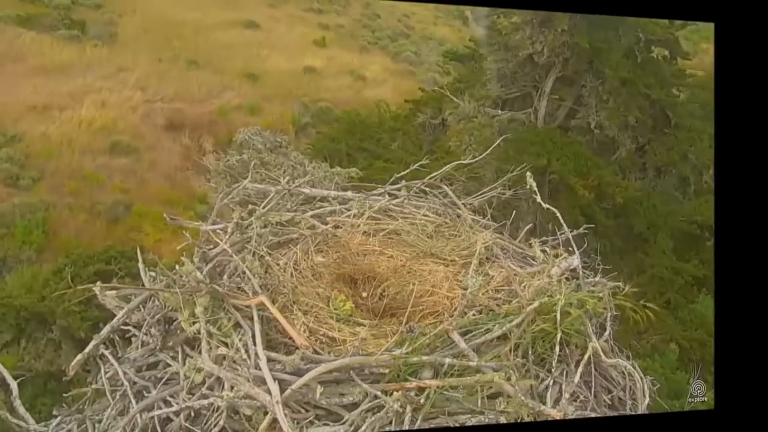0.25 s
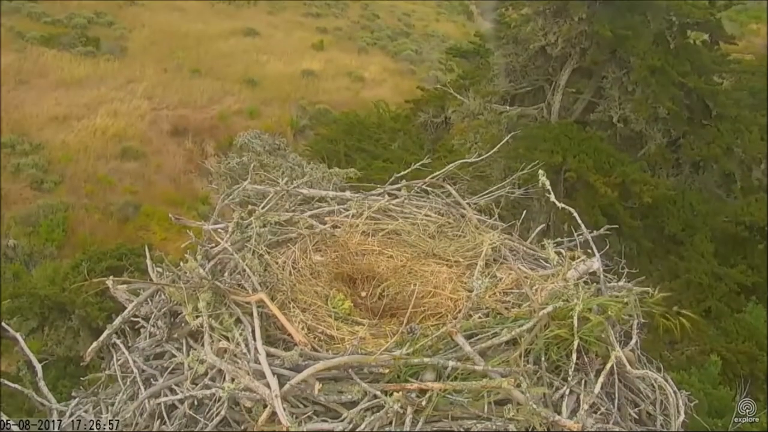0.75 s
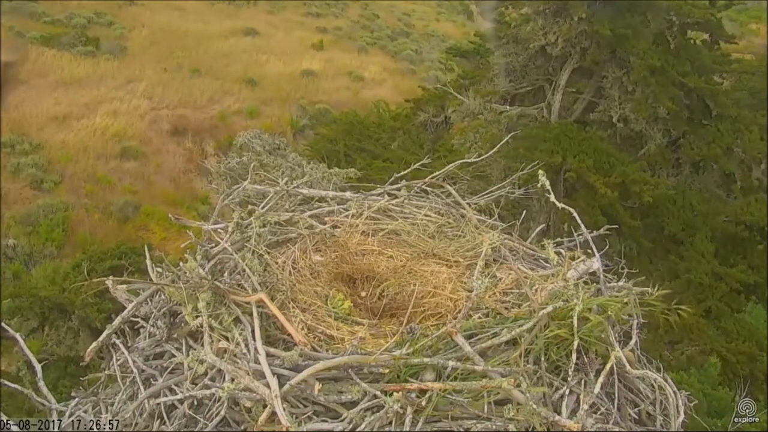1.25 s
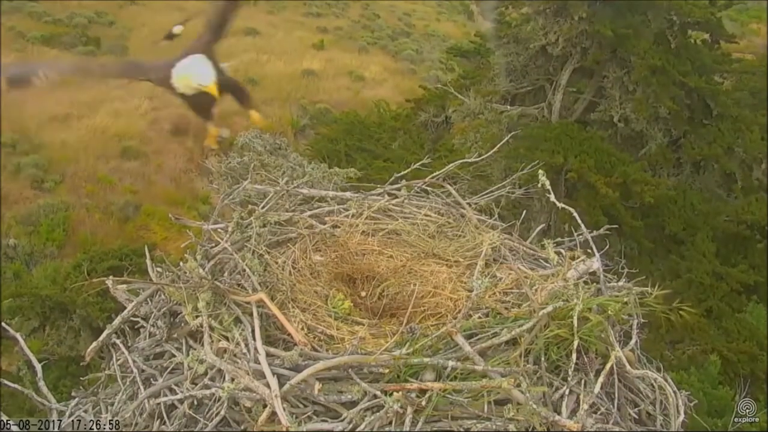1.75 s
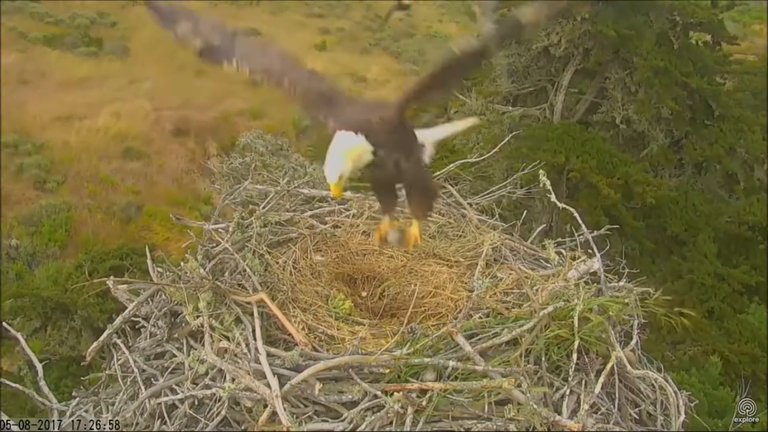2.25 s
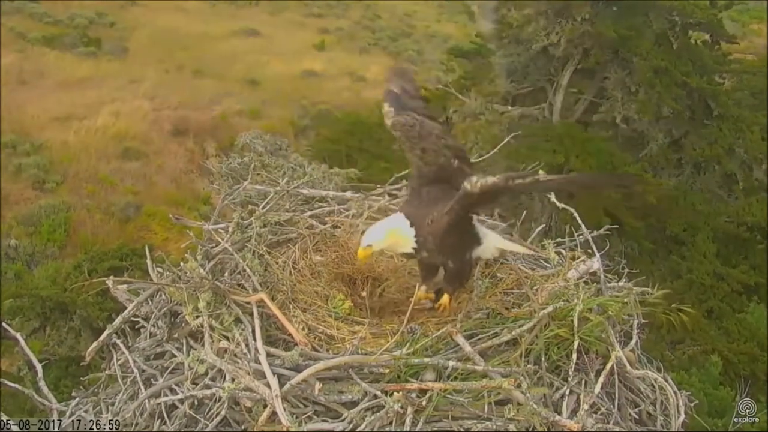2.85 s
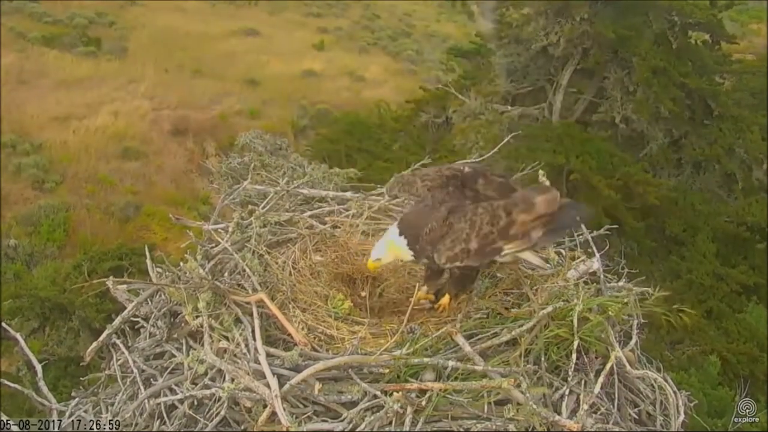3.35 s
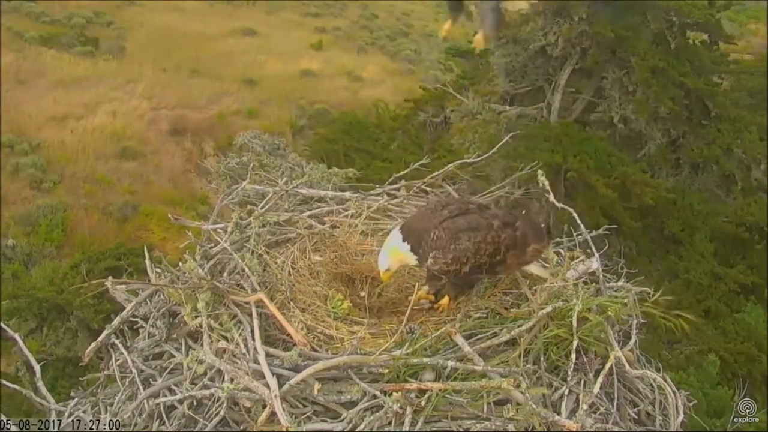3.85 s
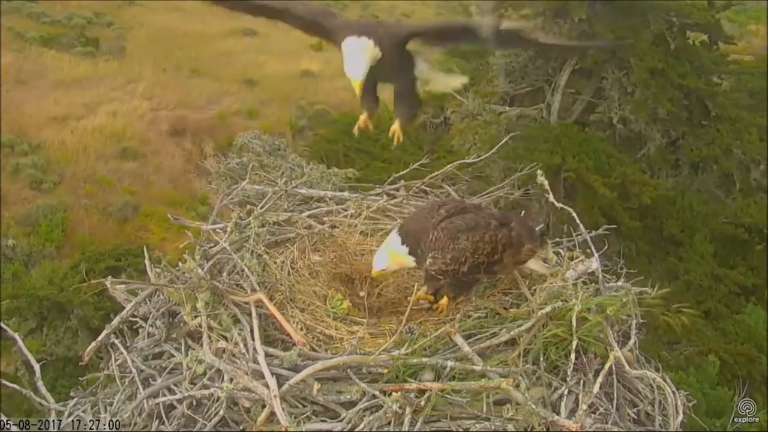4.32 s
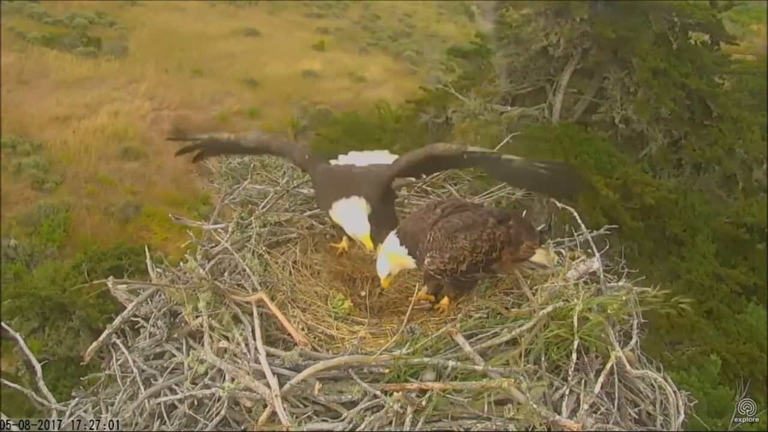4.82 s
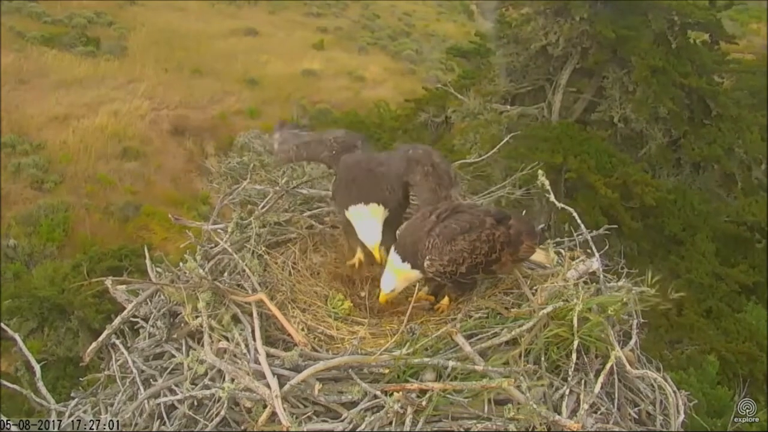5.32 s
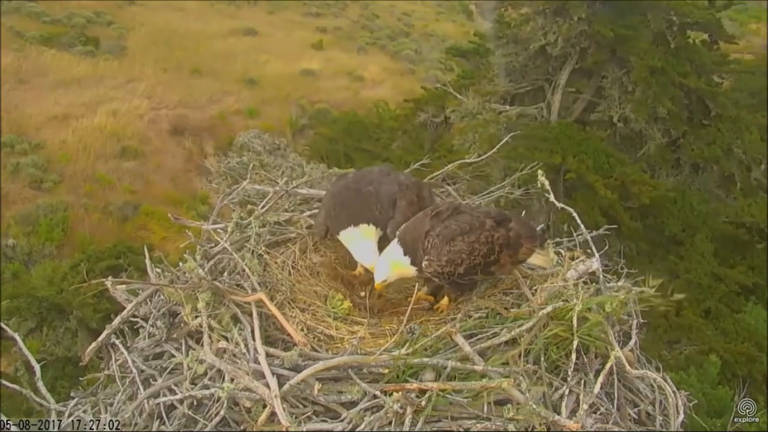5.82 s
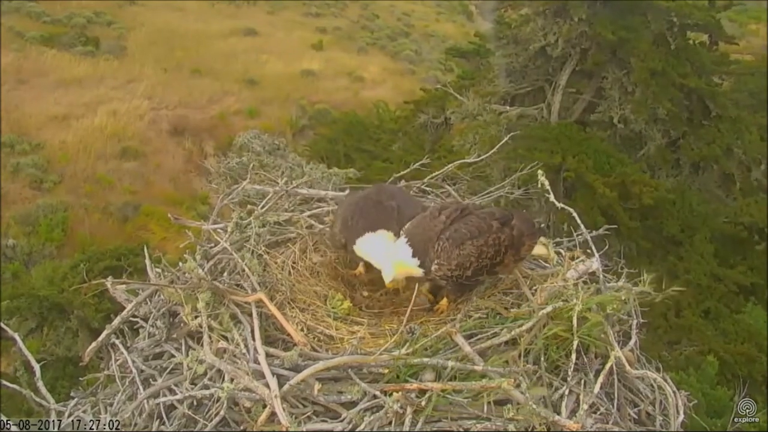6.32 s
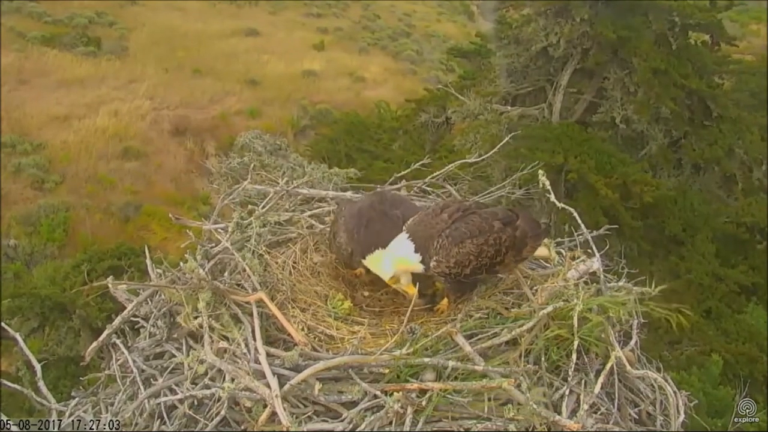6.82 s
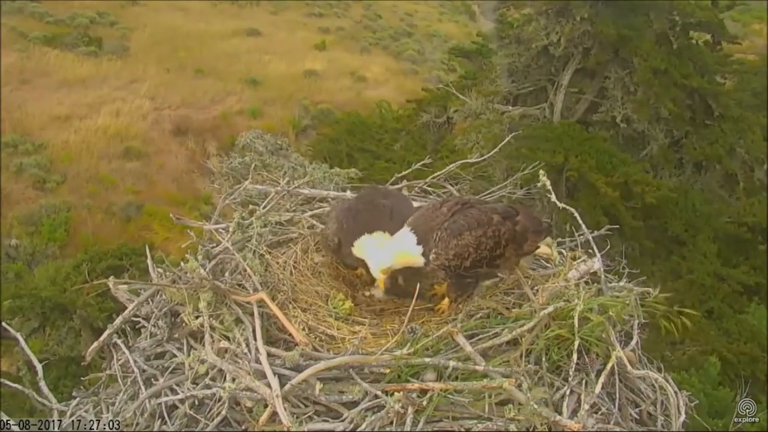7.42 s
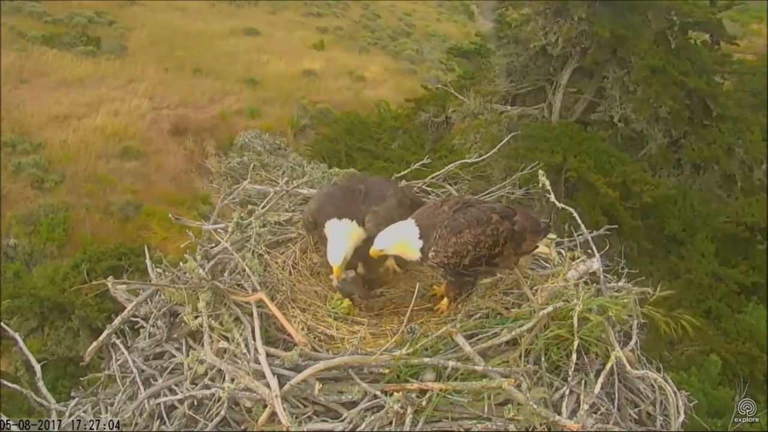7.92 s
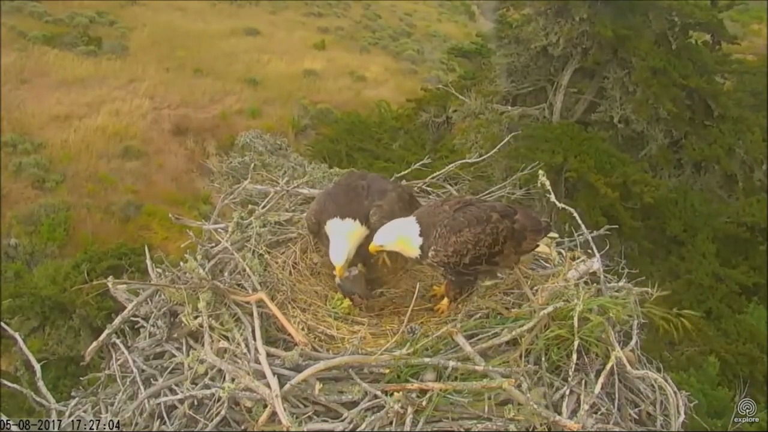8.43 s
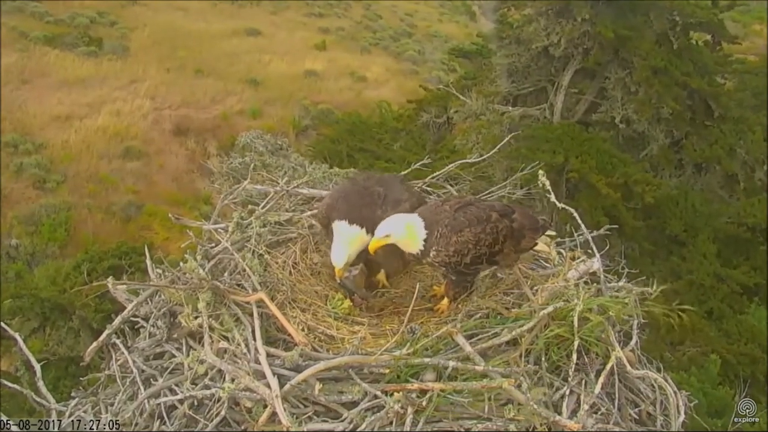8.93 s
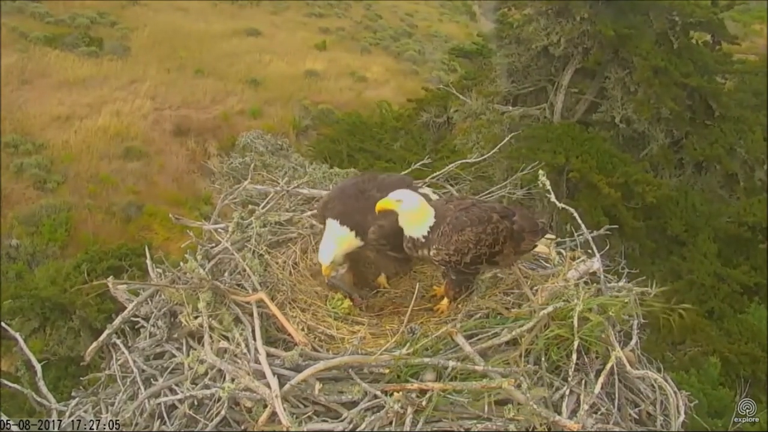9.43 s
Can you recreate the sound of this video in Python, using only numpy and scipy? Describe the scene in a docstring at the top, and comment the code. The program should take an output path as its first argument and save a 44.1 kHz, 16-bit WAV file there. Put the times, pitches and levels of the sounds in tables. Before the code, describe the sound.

Large birds of prey land at a nest and whistle shrilly: small broken chirps first, a brief loud note, a pause, then rapid chatter stretching into long quivering squeals with rough, breathy edges. A faint diffuse echo comes off the open hillside. The mono, slightly distorted nest microphone also picks up gusting wind rumble, soft foliage hiss, a faint high whine, and tiny stick clicks after the calling ends.

```python
"""Two eagles at a stick nest whistle long, piercing notes, amid twig ticks, wind rumble, leaf hiss and a thin whine.
The voices are unsteady sines with side tones and breath; wind and leaves are coloured noise; a twig is a short ring.
Loud notes overload a nest camera's microphone, and the surroundings sink while the birds call.
A crude change from 48 to 44.1 kHz takes the nearest sample, adding copies of tones by multiples of 3.9 kHz."""
import sys
import numpy as np
from scipy import signal
from scipy.fft import rfft, irfft
from scipy.io import wavfile
from scipy.ndimage import uniform_filter1d, map_coordinates

SR = 44100
rng = np.random.default_rng(int(sys.argv[2]) if len(sys.argv) > 2 else 0)


def int16_out(signal):
    """Quantize to a 16-bit WAV file."""
    q = np.round(np.clip(np.atleast_2d(signal).T, -1, 1) * 32767)
    wavfile.write(sys.argv[1], SR, q.astype(np.int16))


def voltage_ratio(level):
    """Linear amplitude factor for a level in decibels (scalar or array-like)."""
    return 10 ** (np.asarray(level, float) / 20)


N = 426447  # length of the scene in samples


def unit(x):
    """Scales a sound to rms 1."""
    return x / np.sqrt(np.mean(x ** 2) + 1e-20)


def curve(rows):
    """Joins (time, value, ..) rows by straight lines: one value per sample for each column."""
    times_s, *columns = np.transpose(rows)
    now_s = np.arange(N) / SR
    return np.squeeze([np.interp(now_s, times_s, column) for column in columns])


def wobble(rate):
    """Draws a smooth random curve through `rate` random points a second."""
    points = rng.standard_normal(int(N * rate / SR) + 4)
    return map_coordinates(points, [np.arange(N) * rate / SR])


def noise(spectrum, patchy_db):
    """Colours random noise by frequency, with random louder and softer patches, at rms 1."""
    hz, _, cells = signal.stft(rng.standard_normal(N), SR, nperseg=1024)
    patches = uniform_filter1d(rng.standard_normal(cells.shape), 8, 0)  # smooth over frequency
    patches = uniform_filter1d(patches, 6, 1)  # and over time
    table_hz, table_db = np.transpose(spectrum)
    colour_db = np.interp(np.log(hz + 1), np.log(table_hz + 1), table_db, left=-120, right=-120)
    gain = voltage_ratio(colour_db[:, None] + patchy_db * unit(patches))
    _, sound = signal.istft(cells * gain, SR, nperseg=1024)
    return unit(sound[:N])


def wind():
    """Gusts rumble on the microphone port, swelling at several speeds; the port cuts the lowest bass."""
    # strength of the gusts before the quicker swells and the sinking: (time [s], level [dB])
    gusts = [(0, -28), (1.0, -27.5), (1.72, -27), (2.5, -30.5), (3.37, -29), (4.09, -31), (4.74, -37),
             (5.22, -22), (5.63, -35), (6.1, -28), (6.76, -26), (6.9, -39.5), (7.15, -31), (7.67, -28),
             (8.21, -34), (8.5, -29.5), (9.1, -28.5), (9.67, -30)]
    # colour of the rumble before the bass cut: (frequency [Hz], relative level per Hz [dB])
    rumble = [(29, -66.5), (50, -66.5), (99, -2), (157, -0.5), (221, -5.5), (381, -29.5), (937, -36),
              (1300, -59.5), (1690, -106), (2860, -120)]
    swells = voltage_ratio(0.89 * wobble(3.32) + 1.47 * wobble(13))
    low_cut = signal.butter(3, 85, "high", fs=SR, output="sos")
    sound = signal.sosfilt(low_cut, swells * noise(rumble, patchy_db=1.5))
    return voltage_ratio(curve(gusts)) * unit(sound)


def foliage():
    """Leaves hiss: steady noise, strongest in the middle treble."""
    # colour of the hiss: (frequency [Hz], relative level per Hz [dB])
    leaves = [(650, -52.5), (1100, -20), (1830, -16), (2870, -0.5), (3740, -6), (5220, -30), (6280, -16),
              (6440, -38.5), (9000, -35.5), (11700, -55), (19800, -120)]
    return voltage_ratio(-56.5) * noise(leaves, patchy_db=1.6)


def whine():
    """The camera's electric whine: one high sine whose level wavers slightly."""
    whine_hz = 10008
    level = voltage_ratio(-58.5 + 0.86 * wobble(4.8))
    return level * np.sin(2 * np.pi * whine_hz * np.arange(N) / SR)


def sinking(calls):
    """Gain in dB of the surroundings: it falls while the calls are loud, then creeps back."""
    start_db, deepest_db = -7.5, -10.5
    loud_db = -22.5  # calls at this level push half as hard as they can
    sink_s, creep_db_per_s = 0.18, 5  # time constant of a full push; speed of return without any
    hop = SR // 100  # steps of 10 ms
    power = np.mean(calls[:N // hop * hop].reshape(-1, hop) ** 2, axis=1)
    loudness = power / voltage_ratio(loud_db) ** 2
    gain_db = [start_db]
    for push in loudness / (1 + loudness):
        fall = push * (gain_db[-1] - deepest_db) / sink_s  # dB per second
        creep = (1 - push) * creep_db_per_s
        gain_db.append(min(0, gain_db[-1] - (fall - creep) * hop / SR))
    return np.interp(np.arange(N) / hop, np.arange(len(gain_db)), gain_db)


def twigs():
    """Dry sticks tick under the birds' feet: a short, fading ring with a noisy crack."""
    # twig ticks: (time [s], starting level of the ring [dB], pitch [Hz])
    ticks = [(1.5534, -35.5, 3080), (7.441, -41.5, 3110), (8.144, -43, 3100), (8.7635, -50, 2680),
             (9.2087, -33, 3120)]
    out = np.zeros(N + SR)
    t = np.arange(800) / SR
    for start_s, db, hz in ticks:
        ring = voltage_ratio(-60 * t / 0.012) * np.sin(2 * np.pi * hz * t)  # falls 60 dB in 12 ms
        crack = voltage_ratio(-60 * t / 0.004) * rng.standard_normal(len(t))
        out[round(start_s * SR):][:len(t)] += voltage_ratio(db) * (ring + 0.27 * crack)
    return out[:N]


def chirp(start_s, length_s, db, first_hz, last_hz):
    """Unfolds a chirp into times, pitch and level: it swells, fades to its end and arches up in pitch."""
    attack_s, rise_db, fade_db = 0.01, 11, 9
    arch = 0.02065  # share of the pitch
    u = np.linspace(0, 1, num=12)  # progress through the chirp
    times_s = start_s + u * length_s
    glide_hz = first_hz + (last_hz - first_hz) * u
    pitch_hz = glide_hz * (1 + arch * np.sin(np.pi * u))
    still_to_rise = np.clip(1 - u * length_s / attack_s, 0, 1)
    return times_s, pitch_hz, db - rise_db * still_to_rise - fade_db * u ** 2


def eagles():
    """Each note is an unsteady sine with weak side tones and breath; notes that overlap roughen the voice."""
    # cries with a shaped contour, one list each, before unsteadiness: (time [s], pitch [Hz], effort [dB])
    cries = [
        [(1.698, 3730, -40), (1.71, 3967, -28.5), (1.742, 3970, -28), (1.765, 3833, -54)],
        [(1.828, 3780, -41), (1.844, 4020, -31.5), (1.862, 4140, -38), (1.886, 3450, -40.5), (1.89, 3541, -39)],
        [(1.9, 3960, -47), (1.925, 4080, -42.5), (1.95, 4430, -43.5), (1.965, 4200, -51)],
        [(2.186, 3400, -44), (2.198, 3590, -32.5), (2.216, 3960, -43), (2.222, 3860, -41), (2.248, 4020, -42),
         (2.262, 3900, -57)],
        [(2.338, 4320, -51.5), (2.356, 4720, -50), (2.39, 4440, -51.5)],
        [(5.283, 4490, -57), (5.291, 4658, -40), (5.309, 4898, -45), (5.357, 4810, -36.5), (5.378, 4470, -34)],
        [(2.395, 3330, -39), (2.421, 3156, -15.5), (2.481, 3200, -20.5), (2.503, 3350, -28), (2.52, 2940, -43)],
        [(3.388, 3550, -33), (3.394, 3553, -17.5), (3.408, 3793, -15.5), (3.424, 3697, -22),
         (3.444, 3309, -17.5), (3.536, 3244, -19.5), (3.562, 3370, -17.5), (3.578, 3746, -16),
         (3.602, 3915, -16), (3.63, 3763, -15.5), (3.67, 3931, -15), (3.688, 3880, -15.5), (3.698, 3229, -20.5),
         (3.712, 3140, -52)],
        [(3.75, 3388, -47), (3.758, 3354, -30), (3.776, 3474, -32), (3.786, 3436, -16), (3.81, 3360, -15.5),
         (3.82, 3180, -28.5)],
        [(3.817, 3636, -33.5), (3.837, 3677, -18), (3.873, 3470, -16), (3.889, 3710, -22), (3.897, 3520, -30.5),
         (3.905, 3405, -28.5)],
        [(3.947, 3933, -36.5), (3.959, 3930, -11.5), (3.971, 3820, -20.5), (3.983, 3615, -20.5),
         (3.993, 3300, -19)],
        [(4.174, 3643, -34.5), (4.186, 3678, -20.5), (4.198, 3670, -12.5), (4.23, 3472, -19.5),
         (4.244, 3207, -21.5), (4.258, 3440, -19), (4.314, 3277, -17.5), (4.324, 3550, -16), (4.36, 3628, -15),
         (4.4, 3541, -15.5), (4.522, 3752, -15.5), (4.596, 3679, -15.5), (4.748, 3883, -16), (4.792, 3781, -14),
         (4.896, 3860, -16.5), (4.914, 3732, -15), (5.022, 3674, -17.5), (5.04, 3880, -33), (5.05, 3875, -31)],
        [(5.125, 3666, -44.5), (5.141, 3598, -15.5), (5.189, 3474, -18), (5.235, 3540, -17.5),
         (5.259, 3620, -34.5), (5.293, 3660, -30.5), (5.308, 3600, -57)],
        [(5.755, 3020, -12.5), (5.767, 3210, -16.5), (5.799, 3235, -17), (5.869, 3058, -17.5),
         (5.949, 3208, -15.5), (6.021, 3187, -16), (6.067, 3106, -15.5), (6.117, 2708, -25.5),
         (6.159, 2773, -24.5), (6.169, 2684, -24), (6.181, 2440, -46)],
        [(6.325, 4006, -55), (6.357, 4050, -40.5), (6.373, 3919, -15.5), (6.383, 3792, -16), (6.423, 3590, -29),
         (6.445, 3700, -40), (6.463, 3706, -20), (6.489, 3613, -19.5), (6.567, 3547, -23.5),
         (6.601, 3610, -18.5), (6.623, 3731, -19.5), (6.661, 3647, -18), (6.691, 3640, -18.5),
         (6.707, 3546, -22.5), (6.765, 3498, -13.5), (6.779, 3571, -16), (6.841, 3379, -16),
         (6.993, 3539, -15.5), (7.025, 3415, -16), (7.059, 3443, -15.5), (7.067, 3294, -20),
         (7.078, 3240, -48.5)],
    ]
    # short chirps between and under the cries, before swell, fade and arch:
    # (start [s], length [s], level [dB], first pitch [Hz], last pitch [Hz])
    chirps = [(1.583, .025, -47, 3700, 3860), (1.575, 0.023, -54.5, 4600, 4600),
              (1.752, .04, -48.5, 4200, 4030), (1.741, 0.022, -35, 3620, 3400),
              (1.807, 0.037, -43, 3920, 4340), (1.806, 0.028, -38.5, 3350, 3530),
              (1.946, 0.032, -34.5, 3530, 3830), (2.184, 0.037, -37.5, 2250, 2540),
              (2.326, 0.024, -39, 3900, 3980), (2.351, 0.031, -46, 4150, 4170),
              (2.386, 0.02, -35.5, 3800, 3910), (2.476, 0.038, -43, 2580, 2580),
              (3.346, 0.023, -28.5, 3150, 3260), (3.344, 0.027, -37, 2100, 2210),
              (3.342, 0.028, -44.5, 1040, 1080), (3.345, 0.026, -45.5, 4250, 4450),
              (3.695, 0.051, -48, 2640, 2440), (3.761, 0.016, -37, 5030, 4840),
              (3.804, 0.051, -20.5, 2600, 2393), (3.898, .078, -15, 2534, 2663),
              (3.955, 0.031, -15.5, 3280, 3120), (4.17, 0.04, -22.5, 3000, 3000),
              (4.62, 0.038, -27, 2991, 3154), (5.018, 0.032, -30, 2460, 2680),
              (5.025, 0.018, -26, 2984, 3280), (5.042, 0.09, -30.5, 4360, 4405),
              (5.17, 0.07, -37.5, 2700, 2705), (5.311, 0.027, -32, 4260, 4200),
              (5.367, 0.021, -14, 3603, 3164), (5.717, 0.054, -14.5, 2870, 2972),
              (6.61, 0.1, -38, 2950, 3000), (6.671, 0.043, -24, 3000, 2840), (8.603, .025, -54, 3300, 3420)]
    # how the voice sits, hoarseness before any clash of notes:
    # (time [s], hoarseness [dB], half-pitch tone [dB], lopsidedness [dB])
    throat = [(2.0, 2.5, -65, -30), (2.4, -2, -57.5, -43.5), (3.78, 3, -63.5, -21), (4.25, 2.5, -37, -22),
              (4.45, 3, -28.5, -17), (4.7, 2, -36.5, -13), (5.0, 3.5, -31, -37.5),
              (5.78, -8.5, -66.5, -34.5), (6.3, 1.5, -30, -33), (6.8, 1, -30.5, -31.5)]
    # colour of the breath: (frequency [Hz], relative level per Hz [dB])
    breath_colour = [(300, -4.5), (1500, -20), (3500, 5.5), (7000, -15.5), (12000, -6), (16000, -10.5)]
    clash_db = 7  # most hoarseness added by two notes at once
    notes = [np.transpose(rows) for rows in cries] + [chirp(*row) for row in chirps]

    tone, effort, total, strongest = np.zeros((4, N))
    for s, hz, db in notes:
        n = np.arange(round(s[0] * SR), round(s[-1] * SR))
        level = voltage_ratio(np.interp(n / SR, s, db))
        total[n] += level
        strongest[n] = np.maximum(strongest[n], level)
    # what sounds besides the strongest note
    clash = uniform_filter1d(np.clip((total - strongest) / voltage_ratio(-27.5), 0, 1), size=600)
    hoarse_db, half_db, lopsided_db = curve(throat)
    hoarse_db = hoarse_db + clash_db * clash
    quiver = 0.00187 * voltage_ratio(hoarse_db) * wobble(120)  # a hoarse voice holds its pitch less well
    shimmer_db = 0.66 * voltage_ratio(hoarse_db) * wobble(150)
    flicker = np.abs(wobble(70))

    for s, hz, db in notes:
        n = np.arange(round(s[0] * SR), round(s[-1] * SR))
        pitch_hz = np.interp(n / SR, s, hz) * (1 + quiver[n])
        phase = 2 * np.pi * np.cumsum(pitch_hz) / SR
        edges = np.clip(np.minimum(n - n[0], n[-1] - n) / (SR * 0.003), 0, 1)  # 3 ms fades
        level_db = np.interp(n / SR, s, db)
        faintness = np.clip(-43.0 - level_db, 0, 15)  # faint notes flicker in and out
        size = np.sqrt(2) * edges * voltage_ratio(level_db + shimmer_db[n] - 0.14 * faintness * flicker[n])
        halves = voltage_ratio(half_db[n]) * (np.sin(phase / 2) + 0.78 * np.sin(3 * phase / 2))
        # an off-centre swing gives even partials once overloaded
        lean = voltage_ratio(lopsided_db[n]) * (1 + 0.91 * np.sin(2 * phase) + 0.32 * np.cos(4 * phase))
        tone[n] += size * (np.sin(phase) + halves + lean)
        effort[n] += size
    breath = voltage_ratio(hoarse_db - 25.5) * effort * noise(breath_colour, patchy_db=8.0)
    return tone + breath


def hillside(x):
    """Trees and slope return a faint, diffuse echo: fading noise that starts after 12 ms."""
    t = np.arange(SR * 3 // 2) / SR
    fade = voltage_ratio(-60 * t / 0.62)  # falls 60 dB in 0.62 s
    tail = rng.standard_normal(len(t)) * fade * (t > 0.012)
    return signal.fftconvolve(x, tail / np.linalg.norm(tail))[:N]


def scene():
    """Adds the birds, their echo and the surroundings at one microphone, the same on both channels."""
    calls = eagles()
    calm_db = sinking(calls)
    blurred = calls * (1 + 1.5 * wobble(90))  # stirring leaves blur the echo
    echo = voltage_ratio(2.56 * calm_db - 13.5) * hillside(blurred)
    background = voltage_ratio(calm_db) * (foliage() + whine())
    gusts = voltage_ratio(0.8 * calm_db) * wind()  # the wind sinks a little less
    mono = calls + echo + background + gusts + twigs()
    return np.array([mono, mono])


def band_limit(x):
    """A steep low-pass at the top of the band."""
    return signal.sosfilt(signal.butter(12, 16830, fs=SR, output="sos"), x)


def record(dry):
    """Takes nearest samples in the rate change, flattens overloaded peaks and limits the band."""
    source_sr, top_hz, ceiling = 48000, 15830, 0.15
    nearest = np.round(np.arange(N) * source_sr / SR) * SR / source_sr
    x = map_coordinates(dry[0], [nearest], order=5, mode="nearest")
    x = x / (1 + np.abs(x / ceiling) ** 12) ** (1 / 12)  # overload
    hz = np.fft.rfftfreq(N, 1 / SR)
    bass_cut = 1 / (1 + (22 / (hz + 1)) ** 4)
    x = irfft(rfft(x) * (hz < top_hz) * bass_cut, N)
    return band_limit(np.array([x, x]))


dry = scene()
out = record(dry)
int16_out(out)
```